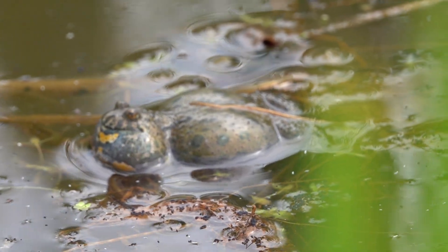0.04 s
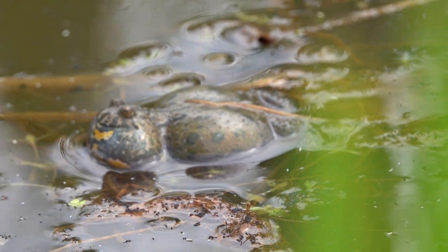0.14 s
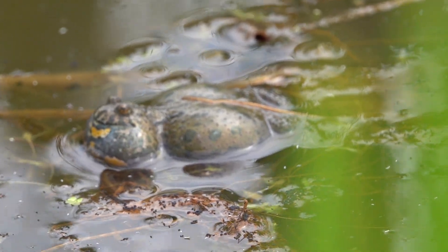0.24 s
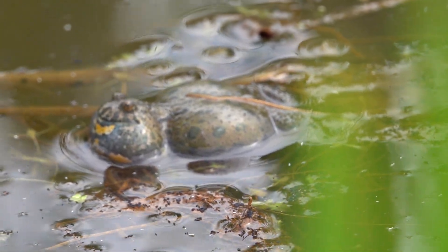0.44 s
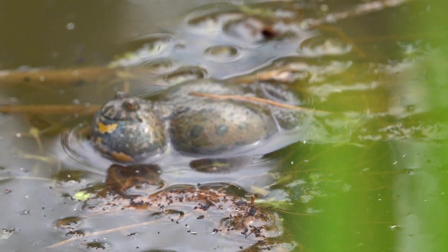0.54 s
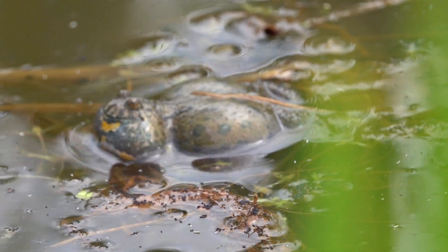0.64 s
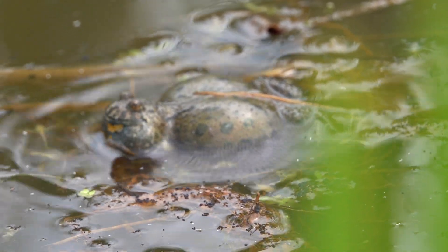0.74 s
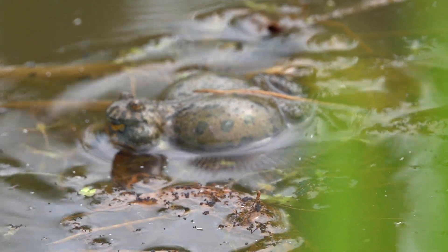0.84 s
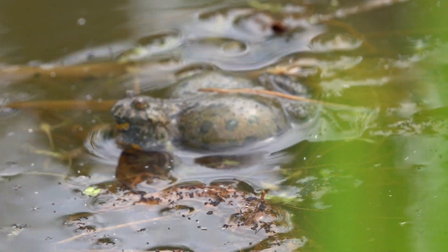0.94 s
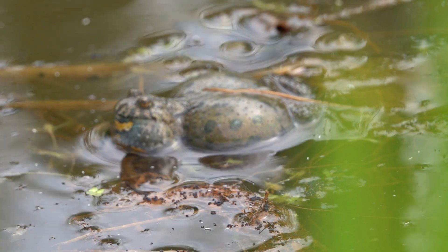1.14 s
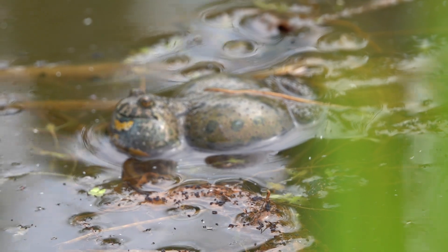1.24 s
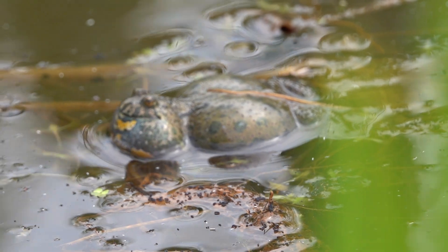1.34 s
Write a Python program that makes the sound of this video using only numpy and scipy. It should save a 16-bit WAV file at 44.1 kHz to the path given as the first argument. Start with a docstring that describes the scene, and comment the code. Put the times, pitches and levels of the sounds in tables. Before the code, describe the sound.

A toad on a still pond gives one soft, clean hoot from about 0.7 to 0.93 seconds, starting slightly sharp, settling near 510 hertz and sagging a little. Deep wind buffeting fills roughly 0.2 to 0.63, calms for the call, and returns weaker around 1.17 to 1.25. Very faint high bird whistles, a small tick near 0.25, a tiny rustle at 0.8 and quiet airy hush lie beneath.

```python
"""A toad floating in a still pond gives one soft, nearly pure hoot that starts a little sharp and settles:
a gliding sine tone with weak overtones and a faint echo from plants and banks.
Wind buffets the microphone before and after it, made from bands of noise that reach higher in strong gusts.
Small birds whistle far off as short gliding tones; faint ticks and rustles are bursts of coloured noise.
Under it all lies the outdoor hush, a mix of steady and slowly changing noise."""
import sys
import numpy as np
from scipy import signal
from scipy.fft import rfft, irfft
from scipy.io import wavfile
from scipy.ndimage import uniform_filter1d

SR = 44100
rng = np.random.default_rng(int(sys.argv[2]) if len(sys.argv) > 2 else 0)


def bounce(signal):
    """Save signal as a 16-bit WAV file at the path given by the first command-line argument."""
    frames = np.transpose(np.atleast_2d(signal))
    limited = np.clip(frames, -1, 1)
    pcm = np.round(limited * 32767).astype(np.int16)
    wavfile.write(sys.argv[1], SR, pcm)


N = 61739  # length in samples, 1.4 s


def undb(db):
    """Turn decibels into a gain."""
    return 10 ** (np.asarray(db) / 20)


def unit(x):
    """Scale a sound to an average (rms) level of 1."""
    return x / np.sqrt(np.mean(x ** 2))


def curve(table, t, column=1):
    """Join one column of a table by straight lines in time."""
    rows = np.array(table)
    return np.interp(t, rows[:, 0], rows[:, column])


def colour(x, points):
    """Make each pitch region louder or softer, following (pitch_hz, level_db) points."""
    pitch_hz, level_db = np.array(points).T
    f = np.maximum(np.fft.rfftfreq(N, 1 / SR), 1)
    filter_db = np.interp(np.log(f), np.log(pitch_hz), level_db)
    return irfft(rfft(x) * undb(filter_db), N)


def noise(points):
    """Make coloured noise with an rms level of 1."""
    return unit(colour(rng.standard_normal(N), points))


def smooth(x, size):
    """Average twice over a sliding window of this many samples."""
    return uniform_filter1d(uniform_filter1d(x, size=size), size=size)


def walk(rate_hz):
    """Wander smoothly and at random around 0, with a typical size of 1."""
    return unit(smooth(rng.standard_normal(N), max(int(SR / rate_hz), 1)))


def stereo(mid, side):
    """Build left and right from the shared middle and the side difference."""
    return np.array([mid + side, mid - side])


def swell(u):
    """Rise and fall in a rounded arch while u goes from 0 to 1."""
    return np.sin(np.pi * np.clip(u, 0, 1))


def sine(hz):
    """Play a pure tone of rms level 1 that follows a pitch."""
    return np.sqrt(2) * np.sin(2 * np.pi * np.cumsum(hz) / SR)


BANK_T60_S, BANK_DELAY_S = .8, .03  # time for the echo to fade by 60 dB, time it takes to build up


def echo(x, t, t60_s, delay_s):
    """Smear a sound with a fading noise tail: diffuse echo from plants and banks."""
    fade = np.exp(-np.log(1000) * t / t60_s)
    build_up = np.clip(t / delay_s, 0, 1)
    tail = rng.standard_normal((2, N)) * fade * build_up
    tail /= np.sqrt(np.sum(tail ** 2, axis=1, keepdims=True))
    return signal.fftconvolve(x[None], tail, axes=1)[:, :N]


# tone colour of the steady far-off air: pitch_hz, level_db (relative)
HUSH_COLOUR = [(100, -4), (330, -5.5), (850, -13.5), (1300, -13), (2200, -12.5), (3300, -14), (4400, -18),
               (5600, -21.5), (12000, -25.5), (15500, -25.5)]
# how wide the far-off air sounds: pitch_hz, side_level_db (relative to the middle's filter)
HUSH_SIDE = [(300, -10), (1000, -4), (3000, -2), (8000, 0), (13000, -8)]
# loudness of the low hush: time_s, level_db
LOW_HUSH = [(0, -62.5), (.25, -67.5), (.6, -62.5), (.85, -57), (1.0, -59.5), (1.15, -65), (1.4, -61.5)]
# tone colour of the low hush: pitch_hz, level_db (relative)
LOW_HUSH_COLOUR = [(60, 3), (200, 2), (330, -1), (560, -1), (850, -5.5), (1200, -14.5), (3000, -40)]
# loudness of the fine high hiss: time_s, level_db
HISS = [(0, -74.5), (.45, -76), (.75, -69), (.87, -70), (1.05, -67), (1.2, -72.5), (1.4, -71.5)]
# tone colour of the hiss: pitch_hz, level_db (relative)
HISS_COLOUR = [(4000, -16.5), (7000, -9), (10000, -4.5), (12500, 1.5), (16000, -11.5)]
HUSH_DB = -62.5  # middle level around which the steady air wavers


def wide_air(points):
    """Spread far-off air noise between left and right, wider at some pitches than others."""
    return stereo(noise(points), colour(noise(points), HUSH_SIDE))


def hush(t):
    """Far-off air as steady noise; its low part and a fine high hiss swell and fade."""
    steady = undb(HUSH_DB + .6 * walk(8)) * wide_air(HUSH_COLOUR)
    low = undb(curve(LOW_HUSH, t)) * wide_air(LOW_HUSH_COLOUR)
    hiss_gain = undb(curve(HISS, t) + 1.2 * walk(60))
    hiss = hiss_gain * stereo(noise(HISS_COLOUR), undb(-7.5) * noise(HISS_COLOUR))
    return steady + low + hiss


# gusts on the microphone: time_s, level_db
WIND = [(0, -44), (.08, -45), (.128, -54), (.19, -37), (.225, -25), (.265, -26.5), (.325, -29), (.385, -24),
        (.415, -24), (.462, -31), (.54, -26), (.615, -31), (.645, -44), (.886, -52), (.93, -47),
        (1.155, -47), (1.175, -31), (1.238, -31), (1.26, -42), (1.324, -37), (1.358, -48), (1.388, -37),
        (1.4, -43)]
# tone colour of the fine turbulence: pitch_hz, level_db (relative)
SKIRT_COLOUR = [(120, -10), (300, -1), (420, -3), (600, -12), (900, -23.5), (1500, -51)]
# how wide the rumble sounds: pitch_hz, side_level_db (relative to the middle)
WIND_SIDE = [(30, -16), (70, -14), (150, -6), (300, 0.5)]
WIND_REF_DB = -25.5  # level of a typical gust
EDDY_HZ, EDDY_HZ_PER_DB = 168, 3.5  # upper edge of the rumble in that gust, and its climb per dB of gust
EDDY_SLOPE = 4.4  # how steeply the rumble fades above its edge (power of pitch)
WIND_LOW_HZ = 44  # the rumble thins out below this pitch
BUFFET_DB = 1.2  # typical random wobble of the level
SKIRT_DB, SKIRT_GROWTH = -58.5, 1.3  # fine turbulence: level in a typical gust, dB per dB of gust


def wind(t):
    """Eddies rumble on the microphone; stronger gusts are louder and reach higher."""
    gust_db = curve(WIND, t)
    over_ref_db = gust_db - WIND_REF_DB
    edge_hz = np.maximum(EDDY_HZ + EDDY_HZ_PER_DB * over_ref_db, WIND_LOW_HZ)
    f = np.fft.rfftfreq(N, 1 / SR)
    air = rfft(rng.standard_normal((2, N)))
    rumble, power = 0, 0
    half_band = 2 ** (1 / 6)
    for hz in 16 * 2 ** (np.arange(20) / 3):  # bands a third of an octave wide
        in_band = (f >= hz / half_band) & (f < hz * half_band)
        band = irfft(air * in_band, N)
        low_cut = hz ** 3 / (hz ** 3 + WIND_LOW_HZ ** 3)
        high_cut = 1 / np.sqrt(1 + (hz / edge_hz) ** (2 * EDDY_SLOPE))
        gain = low_cut * high_cut / np.sqrt(hz)
        rumble = rumble + gain * band
        power = power + gain ** 2 * np.mean(band ** 2)
    rumble = rumble / np.sqrt(power)
    # even out the chance swells, so that the gust table sets the loudness
    rumble = rumble / np.sqrt(smooth(rumble[0] ** 2, 2400))
    mid, side = rumble * undb(gust_db + BUFFET_DB * walk(50))
    skirt = undb(SKIRT_DB + SKIRT_GROWTH * over_ref_db) * noise(SKIRT_COLOUR)
    return stereo(mid + skirt, colour(side, WIND_SIDE))


def bursts(t, table, points, rise_s, decay_s, side_db):
    """Short crackles of one noise colour, each with a quick rise and a dying fall."""
    shape = np.zeros(N)
    for start_s, level_db in table:
        rise = np.clip((t - start_s) / rise_s, 0, 1)
        fall = np.exp(-np.maximum(t - start_s - rise_s, 0) / decay_s)
        shape += undb(level_db) * rise * fall
    return shape * stereo(noise(points), undb(side_db) * noise(points))


# brief high rustles: start_s, level_db
RUSTLES = [(0.8, -56.5), (0.806, -58), (.826, -58.5)]
# tone colour of the rustles: pitch_hz, level_db (relative)
RUSTLE_COLOUR = [(2000, -12), (3400, -4.5), (5500, -18.5), (7800, -10.5), (9500, -15), (12500, -0.5),
                 (14500, -8.5), (16000, -16.5)]


def rustles(t):
    """Brief, wide bursts of high noise."""
    return bursts(t, RUSTLES, RUSTLE_COLOUR, rise_s=.003, decay_s=.017, side_db=-2.5)


# small ticks: start_s, level_db
TICKS = [(.184, -61.5), (.203, -65.5), (.228, -60), (0.2456, -47), (.716, -57.5), (.734, -60), (.745, -64),
         (1.076, -69), (1.087, -61.5), (1.101, -65)]
# tone colour of the ticks: pitch_hz, level_db (relative)
TICK_COLOUR = [(1500, -34), (2700, -7.5), (3800, -19), (4850, 0.5), (5600, -7), (7000, -17.5),
               (10000, -22.5), (13000, -18.5), (16000, -35)]


def ticks(t):
    """Tiny noise bursts that die away faster than the rustles."""
    return bursts(t, TICKS, TICK_COLOUR, rise_s=.002, decay_s=.0053, side_db=-8.5)


# bird whistles: start_s, length_s, first_pitch_hz, last_pitch_hz, bow_hz (mid-way bend), level_db
WHISTLES = [(.045, 0.055, 4730, 3580, 139, -67.5), (.135, 0.031, 4750, 4230, -8, -67.5),
            (.228, .085, 3873, 4244, -72.5, -65), (.317, .158, 4290, 5720, -170, -62),
            (.41, 0.044, 4550, 3960, -7, -73), (.478, 0.044, 4900, 3950, -12, -63.5),
            (.478, 0.037, 4220, 3850, 10, -70), (.57, .058, 4900, 4080, -88, -63.5),
            (.67, .045, 4800, 4450, 1, -69.5), (.678, .025, 4150, 3900, -1.5, -69),
            (.865, 0.036, 4400, 3664, -6.5, -68), (.94, .06, 3308, 3223, 6, -66),
            (1.078, 0.024, 4146, 3880, 13, -71.5), (1.115, 0.084, 2300, 2240, -1, -67.5),
            (1.30, .038, 4610, 3890, 65, -68), (1.31, 0.037, 3150, 3080, 6, -72)]
BIRD_WAVER = .006  # typical random pitch change, as a fraction
BIRD_FLUTTER_DB, BIRD_FLUTTER_HZ = 2.4, 170  # typical random loudness change, and its rate
LEAF_T60_S, LEAF_DB = .08, -2  # short scatter from leaves
BIRD_BANK_DB = -6.5  # long echo of the birds


def birds(t):
    """Thin, far whistles that glide and flutter, scattered by leaves on their way."""
    song = np.zeros(N)
    for start_s, length_s, first_hz, last_hz, bow_hz, level_db in WHISTLES:
        u = np.clip((t - start_s) / length_s, 0, 1)
        glide_hz = first_hz + (last_hz - first_hz) * u + bow_hz * swell(u)
        hz = glide_hz * (1 + BIRD_WAVER * walk(380))
        loudness = undb(level_db + BIRD_FLUTTER_DB * walk(BIRD_FLUTTER_HZ)) * np.sqrt(swell(u))
        song += loudness * sine(hz)
    leaves = undb(LEAF_DB) * echo(song, t, LEAF_T60_S, delay_s=.002)
    banks = undb(BIRD_BANK_DB) * echo(song, t, BANK_T60_S, BANK_DELAY_S)
    return song + leaves + banks


# the hoot's loudness: time_s, level_db
HOOT = [(.700, -56), (.705, -34), (.712, -24.5), (.722, -19), (.738, -15.6), (.762, -15.3), (.785, -16.3),
        (.845, -17.3), (.872, -20), (.895, -26), (.915, -36), (.945, -50), (1.0, -66)]
# loudness of the overtones: time_s, second_db, third_db, fourth_db, fifth_db
OVERTONES = [(.699, -75, -87.5, -91.5, -93), (.707, -50.5, -62.5, -75.5, -89), (.722, -45, -71, -62, -85.5),
             (.742, -52.5, -56, -57, -79.5), (.768, -58.5, -60, -55.5, -74), (.798, -49, -59, -54.5, -77),
             (.835, -49.5, -60.5, -53, -71.5), (.883, -52, -57, -57, -70.5), (.899, -57.5, -68.5, -81, -99),
             (.914, -63, -73, -87, -100)]
HOOT_S, HOOT_HZ = .7003, 511.8  # start, and the pitch it settles towards before the sag
SHARP_HZ, SETTLE_S, SAG_HZ_PER_S = 42.28, .019, 38  # extra pitch at the start, its fading time, slow sag
JITTER, SHIMMER_DB = .0015, .08  # typical random change of pitch (fraction) and of loudness
LEAD_S, LEAD_LENGTH_S, LEAD_HZ, LEAD_DB = .674, .028, 562, -43  # soft note as the call gets going
TOAD_PAN_DB = -.7  # left level minus right level
TOAD_BANK_DB = -44  # long echo of the toad


def within(table, t):
    """Tell which moments lie inside a table's first and last times."""
    return (t > table[0][0]) & (t < table[-1][0])


def toad(t):
    """A soft lead-in, then a clean tone with weak overtones whose pitch settles and slowly sags."""
    age_s = np.maximum(t - HOOT_S, 0)
    glide_hz = HOOT_HZ + SHARP_HZ * np.exp(-age_s / SETTLE_S) - SAG_HZ_PER_S * age_s
    hz = glide_hz * (1 + JITTER * walk(120))
    hoot_db = uniform_filter1d(curve(HOOT, t), size=300)  # rounds the corners
    voice = sine(hz) * undb(hoot_db) * within(HOOT, t)
    for k in range(1, len(OVERTONES[0])):
        overtone = sine((k + 1) * hz) * undb(curve(OVERTONES, t, column=k))
        voice = voice + overtone * within(OVERTONES, t)
    voice = voice * undb(SHIMMER_DB * walk(80))
    lead_in = swell((t - LEAD_S) / LEAD_LENGTH_S) * sine(np.full(N, LEAD_HZ))
    voice = voice + undb(LEAD_DB) * lead_in
    direct = voice * undb(np.array([[TOAD_PAN_DB], [-TOAD_PAN_DB]]) / 2)
    return direct + undb(TOAD_BANK_DB) * echo(voice, t, BANK_T60_S, BANK_DELAY_S)


def scene():
    """Add up the pond: hush, wind, rustles, ticks, birds and toad."""
    t = np.arange(N) / SR
    return hush(t) + wind(t) + rustles(t) + ticks(t) + birds(t) + toad(t)


def record(dry):
    """The recorder cuts the top steeply, above 15.7 kHz."""
    top_cut = signal.ellip(10, .2, 80, 15700, fs=SR, output="sos")
    return signal.sosfilt(top_cut, dry)


dry = scene()
out = record(dry)
bounce(out)
```